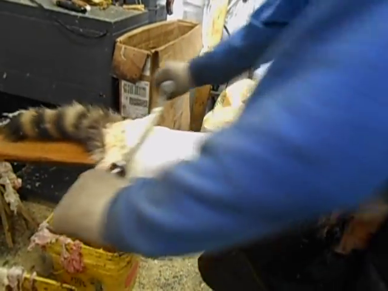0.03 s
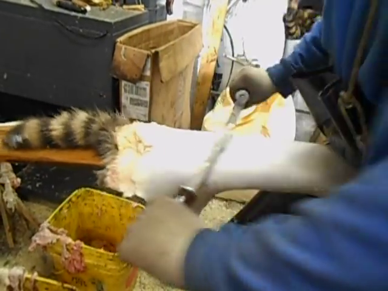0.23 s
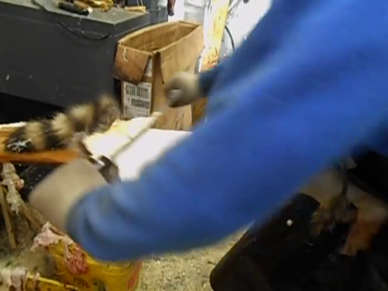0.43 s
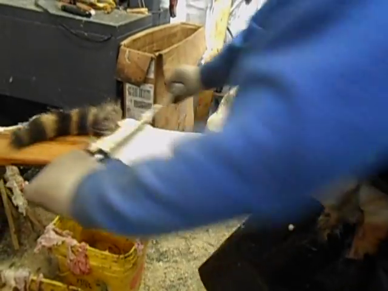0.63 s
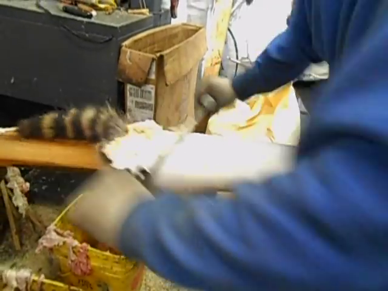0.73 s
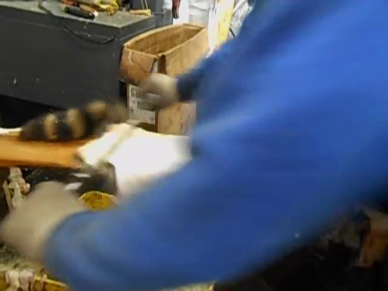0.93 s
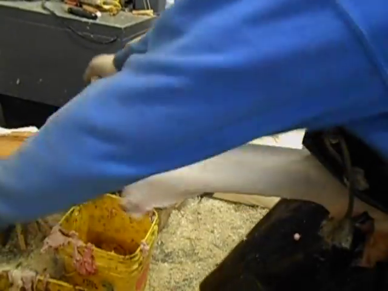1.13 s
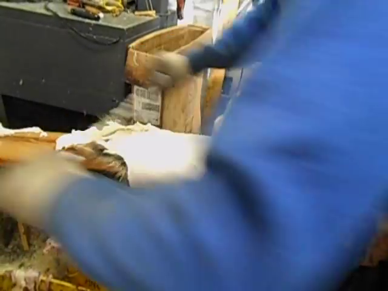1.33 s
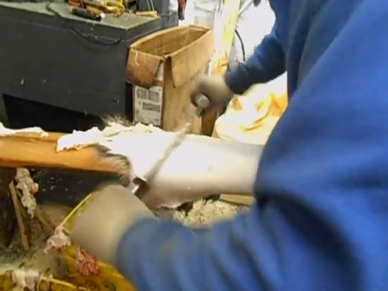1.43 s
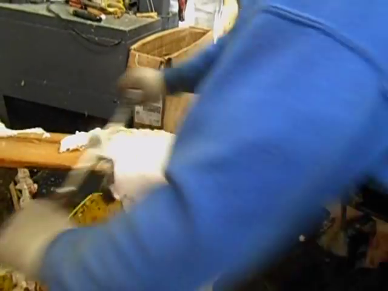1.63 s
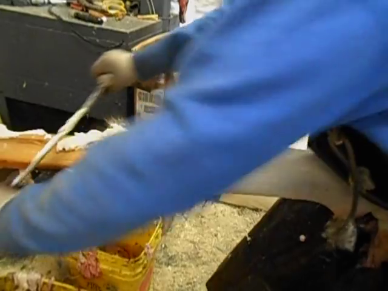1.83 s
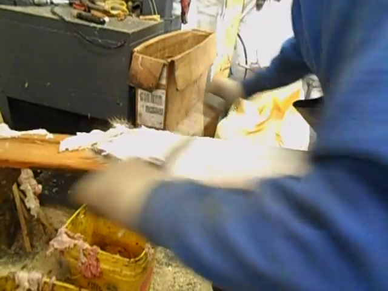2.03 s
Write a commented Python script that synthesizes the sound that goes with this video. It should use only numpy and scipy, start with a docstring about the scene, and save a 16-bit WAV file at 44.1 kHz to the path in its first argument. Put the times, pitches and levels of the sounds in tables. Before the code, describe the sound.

In a small workshop with a low machine hum, a blade scrapes along a hide in three pushes, each a soft wooden thud followed by a juddering hiss and tiny snaps. Light tool taps come between the later strokes.

```python
"""Over the hum of a machine in a small workshop, a dull knock: a two-handled fleshing knife lands on a
hide and the wooden beam under it heaves. The blade sticks and slips through the fat with a judder, fibres
part in a crackling hiss and strands of membrane snap. Three pushes, with light taps of the tool as it is
drawn back; the last push ends in a short rasp as the blade chatters."""
import sys
import numpy as np
from scipy import signal
from scipy.fft import rfft, irfft
from scipy.io import wavfile

SR = 44100
rng = np.random.default_rng(int(sys.argv[2]) if len(sys.argv) > 2 else 0)


def wav_record(signal):
    """Record a signal, one row per channel, as 16-bit PCM in the file named by sys.argv[1]."""
    frames = np.transpose(np.atleast_2d(signal))
    bounded = np.clip(frames, -1, 1)
    # unit amplitude maps onto the largest positive 16-bit level
    quanta = np.round(bounded * 32767).astype(np.int16)
    wavfile.write(sys.argv[1], SR, quanta)


N = 92610
T = np.arange(N) / SR
FREQS = np.fft.rfftfreq(N, 1 / SR)
TREBLE_EDGE_HZ = 11000


def amp(db):
    return 10 ** (np.asarray(db) / 20)


def unit(x):
    """Scales to rms 1."""
    return x / np.sqrt(np.mean(x ** 2) + 1e-20)


def colour(x, curve):
    """Shapes x with an EQ curve of (Hz, dB) points, at rms 1."""
    hz, db = np.transpose(curve)
    gain = amp(np.interp(np.log(FREQS + 1), np.log(hz), db))
    return unit(irfft(rfft(x) * gain, N))


def noise():
    return rng.standard_normal(N)


def wander(hz):
    """Smooth random drift up to about hz, at rms 1."""
    return unit(irfft(rfft(noise()) * np.exp(-(FREQS / hz) ** 2), N))


def slips(per_s, spread_db=2):
    """Random clicks of uneven size."""
    size = amp(spread_db * np.minimum(rng.exponential(1, N), 4)) * np.sign(noise())
    return unit(size * (rng.random(N) < per_s / SR))


def envelope(start, db, rise, hold, release):
    """Rises, holds, then falls 20 dB every `release` seconds."""
    t = T - start
    return np.clip(t / rise, 0, 1) * amp(db - 20 * np.maximum(t - rise - hold, 0) / release)


def burst(start, decay):
    """A hard attack and an exponential decay."""
    return (T >= start) * np.exp(-np.maximum(T - start, 0) / decay)


def room(x, wet_db, t60=0.27):
    """Adds the short reverb tail of the workshop."""
    t = T[:SR // 2]
    tail = rng.standard_normal(len(t)) * amp(-60 * t / t60) * (t > .004)
    return x + amp(wet_db) * signal.fftconvolve(x, tail / np.linalg.norm(tail))[:N]


# The room tone's EQ. Each row: frequency in Hz, gain in dB.
ROOM_TONE_EQ = [(12, -4.5), (20, 6), (35, -7.5), (55, -22), (88, -12), (130, -19.5), (175, -18.5),
                (266, -21), (400, -17.5), (800, -22.5), (1300, -26.5), (2200, -27), (3600, -39.5),
                (6000, -42), (10500, -44.5)]
# The room tone dips briefly after the second push. Each row: time in seconds, level in dB.
ROOM_TONE_FADER = [(0, -24.5), (.5, -24.5), (.75, -22.5), (1.0, -25.5), (1.12, -34.5), (1.21, -29),
                   (1.45, -24.5), (1.78, -27), (1.95, -25), (2.1, -25.5)]
# The machine's partials. Each row: frequency in Hz, average level in dB.
HUM_PARTIALS = [(173, -40.5), (377, -39), (453, -52), (657, -63), (786, -44)]


def workshop(waver_rad=0.51, waver_hz=5.5):
    """The bed: room tone and a wavering machine hum, riding one fader."""
    level_db = np.interp(T, *np.transpose(ROOM_TONE_FADER))
    hum = sum(amp(db) * np.sin(2 * np.pi * hz * T + waver_rad * wander(waver_hz))
              for hz, db in HUM_PARTIALS)
    return amp(level_db) * colour(noise(), ROOM_TONE_EQ) + amp(level_db - level_db.mean()) * hum


# Taps of the tool. Each row: start in seconds, level in dB.
TAP_CUES = [(1.189, -22.5), (1.434, -19), (1.826, -31)]
# Their EQ. Each row: frequency in Hz, gain in dB.
TAP_EQ = [(100, -7), (400, 9.5), (1200, 0), (2600, -5.5), (6000, -44), (11000, -19)]


def taps():
    """The tool taps lightly as it is drawn back."""
    return sum(amp(db) * burst(start, decay=0.003) for start, db in TAP_CUES) * colour(noise(), TAP_EQ)


# Membrane snaps. Each row: start in seconds, level in dB, decay in seconds, low cut in Hz.
SNAP_CUES = [(.108, -30, 0.0057, 8100), (.125, -25, 0.002, 8000), (0.2882, -23, 0.0015, 7200),
             (.2985, -16, 0.00075, 5000), (0.414, -17.5, 0.0078, 2790), (.509, -17, 0.0012, 7000),
             (0.951, -17, 0.0011, 6000), (.972, -11, 0.0015, 5670), (0.975, -17, 0.0024, 3480),
             (1.009, -15.5, 0.0024, 7640), (1.568, -11.5, 0.0043, 2460)]


def snaps():
    """Strands of membrane tear with bright ticks."""
    out = np.zeros(N)
    for start, db, decay, hz in SNAP_CUES:
        bright_eq = [(hz / 2, -24), (hz, 0), (TREBLE_EDGE_HZ, 0), (SR / 2, -40)]
        out += amp(db) * burst(start, decay) * colour(noise(), bright_eq)
    return out


# What rings in the rasp. Each row: frequency in Hz, bandwidth in Hz, relative level in dB.
RASP_MODES = [(520, 45, -4), (790, 55, -8), (958, 45, -2), (1130, 120, -8), (1560, 90, -3), (1720, 80, -8),
              (2510, 70, -5), (2710, 90, -4), (2990, 100, -4), (3450, 200, -8), (3760, 110, -9),
              (4600, 250, -11), (5300, 600, -12)]


def rasp():
    """Fast chatter rings the blade and the beam at the end of the last push."""
    t, chatter = T[:SR // 4], slips(per_s=3000)
    ring = sum(amp(db) * np.sqrt(width) * np.exp(-np.pi * width * t) * np.cos(2 * np.pi * hz * t)
               for hz, width, db in RASP_MODES)
    level = envelope(start=1.652, db=-22.3, rise=.016, hold=.046, release=.06)
    return level * unit(signal.fftconvolve(chatter, ring)[:N])


# The beam's resonances. Each row: frequency in Hz, relative level in dB, seconds to fall 60 dB.
WOOD_MODES = [(86.8, -30, 1), (206.6, -22, 0.21), (376.5, -24, 0.063), (424, -15, 0.17), (534.6, -15, 0.1),
              (604, -22, 0.074), (740, -40, 0.16), (791, -30.5, 0.11), (1008, -22, 0.16)]


def beam_ring(x):
    """The wooden beam rings when x drives it."""
    t = T[:SR // 2]
    ring = sum(amp(db - 60 * t / t60) * np.sin(2 * np.pi * hz * t) for hz, db, t60 in WOOD_MODES)
    return signal.fftconvolve(x, ring)[:N] * 2 * np.pi * 200 / SR


# The beam under the slipping blade. Each row: frequency in Hz, gain in dB.
BEAM_EQ = [(30, -17), (60, -15), (85, 0), (125, -10), (190, 2), (290, -4), (420, -12), (700, -14.5),
           (1100, -22), (2000, -29), (8000, -29)]


def beam_body(friction):
    """The beam gives friction its dull, woody tone."""
    return colour(friction, BEAM_EQ)


# The blade lands. Each row: time in seconds, knock drive in dB, wait until mid-heave in seconds,
# heave level in dB, heave frequency in Hz.
LANDING_CUES = [(0.23, -2.5, 0.041, -4.5, 16.4), (0.7862, -4.5, 0.041, -2.5, 17.5),
                (1.4691, 0.5, 0.0353, -2.5, 21)]


def landings(knock_s=0.0015, heave_cycles=0.6, low_cut_hz=65):
    """The blade lands with a soft double knock and a short rub; the beam bumps back and heaves once."""
    def bump(at):
        return np.exp(-abs(T - at) / knock_s)

    knocks, heaves, rub = np.zeros(N), np.zeros(N), beam_body(noise())
    for at, db, wait, heave_db, heave_hz in LANDING_CUES:
        first_touch = amp(-4) * bump(at - 0.00433)
        rebound = amp(-7.5) * bump(at + 0.019)
        settle = amp(-22) * burst(at, decay=0.032) * rub
        knocks += amp(db) * (-first_touch - bump(at) + rebound + settle)
        cycles = (T - at - wait) * heave_hz
        heaves -= amp(heave_db) * np.sin(2 * np.pi * cycles) * np.exp(-(cycles / heave_cycles) ** 2)
    knocks = signal.lfilter(*signal.butter(1, low_cut_hz, "high", fs=SR), knocks)
    return room(knocks + amp(-11.5) * beam_ring(knocks), wet_db=-6) + heaves


# The hiss on the skin, through pushes and returns. Each row: time in seconds, relative level in dB.
HISS_FADER = [(0, -46), (.07, -50), (.115, -37), (.15, -53), (.25, -45), (.35, -30.5), (.41, -25.5),
              (.51, -27.5), (.57, -47), (.63, -52), (.68, -41), (.82, -37.5), (.885, -28), (.98, -24.5),
              (1.012, -30), (1.025, -37), (1.07, -36.5), (1.14, -59), (1.43, -58), (1.475, -42),
              (1.50, -42), (1.57, -26.5), (1.61, -30.5), (1.695, -31), (1.79, -58), (2.1, -55)]
# The edge bites hardest. Each row: centre in seconds, level in dB, half length in seconds.
BITE_CUES = [(0.402, -26.5, 0.058), (0.928, -28, 0.034), (1.05, -34.5, 0.017), (1.576, -24.5, 0.01),
             (1.701, -35.5, 0.021)]
# EQs of the airy hiss and the gritty bite. Each row: frequency in Hz, gain in dB.
HISS_EQ = [(300, -1), (1000, 1.5), (1700, -11), (2700, 1), (4000, 2.5), (6000, 2.5), (8000, 7.5),
           (10200, 9.5), (11500, -13.5)]
BITE_EQ = [(400, -46), (1100, 4.5), (1700, -2.5), (2500, 0), (3400, -2.5), (5000, -20.5), (10000, -45)]


def scrape(fibres_per_s=7000, spread_db=2.5, hiss_trim_db=0.5):
    """Thousands of tiny fibres part under the edge, coarser where it bites."""
    flutter_db = 2 * wander(hz=108) + 1.5 * wander(hz=457)  # fibres part in clumps
    hiss_db = np.interp(T, *np.transpose(HISS_FADER)) + hiss_trim_db + flutter_db
    bite = sum(amp(db) * np.exp(-.5 * ((T - centre) / half) ** 2) for centre, db, half in BITE_CUES)
    hiss = colour(slips(fibres_per_s, spread_db), HISS_EQ)
    grit = colour(slips(fibres_per_s, spread_db), BITE_EQ)
    return amp(hiss_db) * hiss + bite * grit


# The sub rumble of the beam swaying under a push. Each row: frequency in Hz, gain in dB.
SWAY_EQ = [(10, -19), (20, 9.5), (33, -25), (55, -28), (150, -70), (1000, -90)]
# The pushes. Each row: start in seconds, relative judder and drag levels in dB, rise and hold in
# seconds, release in seconds per 20 dB, top of the judder in Hz.
PUSH_CUES = [(0.301, -15, -20.5, 0.033, 0.063, 0.1048, 836), (0.869, -14.5, -22.5, 0.033, 0.058, 0.12, 714),
             (1.538, -15, -19.5, 0.037, 0.015, 0.1767, 784)]


def judder(slips_per_s=600, drag_lead_s=0.029, sway_db=6.5):
    """The blade drags the hide over the beam, then sticks and slips in the fat; the drag dies last."""
    out = np.zeros(N)
    for start, judder_db, drag_db, rise, hold, release, top_hz in PUSH_CUES:
        octaves = np.log2((FREQS + 1) / top_hz)
        width_oct = np.where(octaves < 0, 1.0, 0.36)  # gentle skirt below, steep above
        tilt = np.maximum(octaves + 1, 0)
        band = np.exp(-(octaves / width_oct) ** 2 - tilt)
        shake = unit(irfft(rfft(slips(slips_per_s)) * band, N))
        drag = beam_body(slips(slips_per_s)) + amp(sway_db) * colour(noise(), SWAY_EQ)
        out += envelope(start, judder_db, rise, hold, release) * shake
        out += envelope(start - drag_lead_s, drag_db, rise + drag_lead_s, hold, release=0.22) * drag
    return room(amp(-1) * (out + beam_ring(out)), wet_db=-10)


def scene():
    """The mono mix: the weight of the pushes, their crisp detail, the rasp and the bed."""
    weight = judder() + landings()
    detail = room(scrape() + snaps() + taps(), wet_db=-10.5)
    return (weight + detail + rasp() + workshop())[None]


def record(dry):
    """A soft limiter rounds off the highest peaks and a low-pass trims the top."""
    ceiling = .85
    limited = dry / (1 + (dry / ceiling) ** 8) ** (1 / 8)
    low_pass = signal.firwin(161, TREBLE_EDGE_HZ, window=("kaiser", 8), fs=SR)
    return signal.oaconvolve(limited, low_pass[None], "same")


dry = scene()
out = record(dry)
wav_record(out)
```